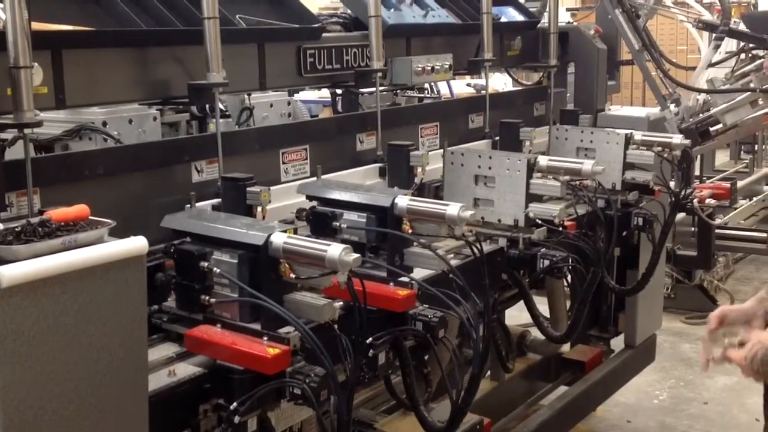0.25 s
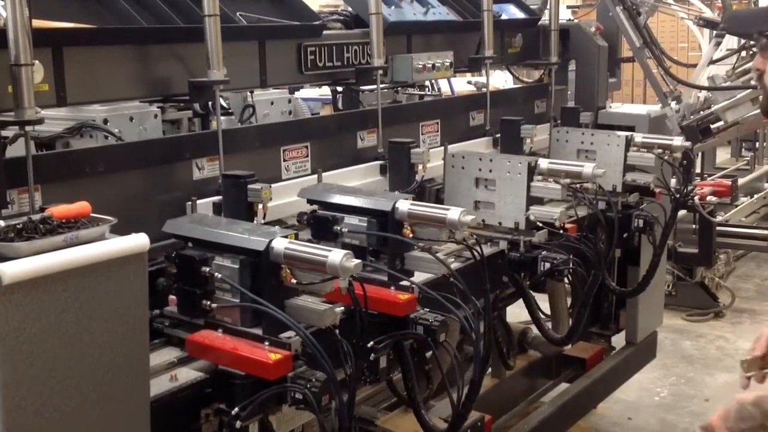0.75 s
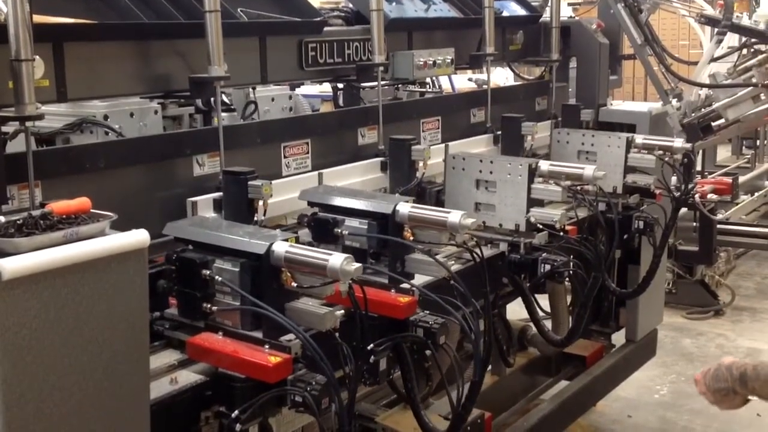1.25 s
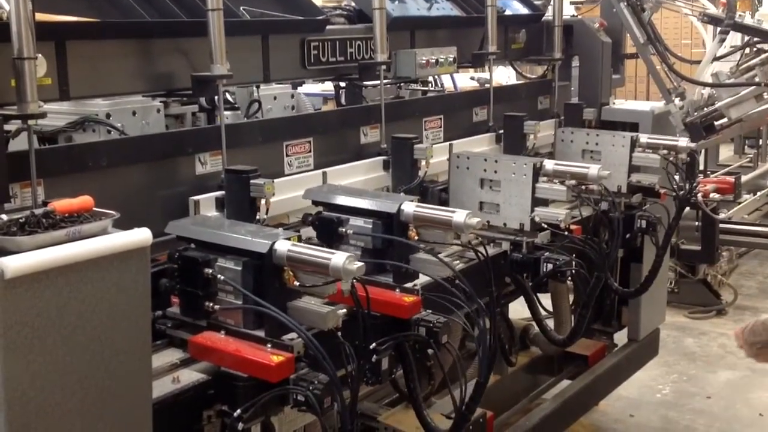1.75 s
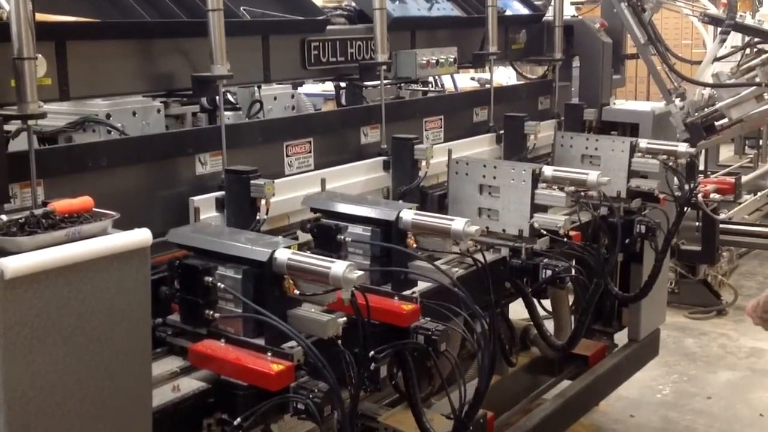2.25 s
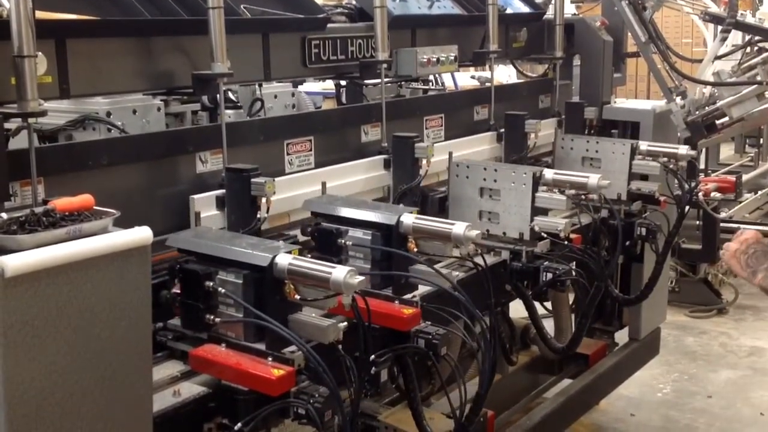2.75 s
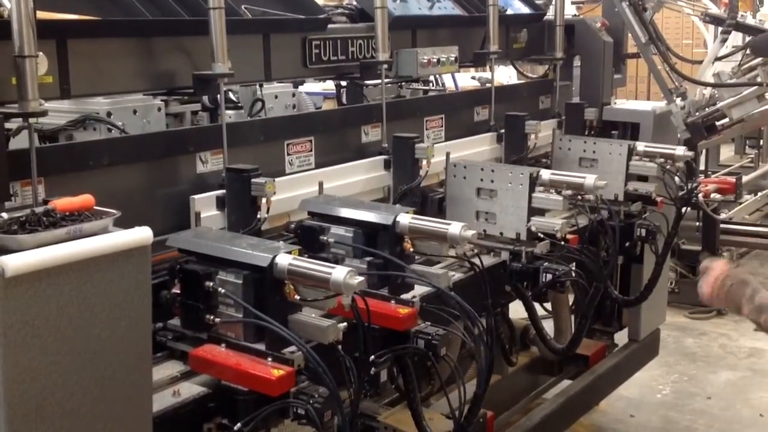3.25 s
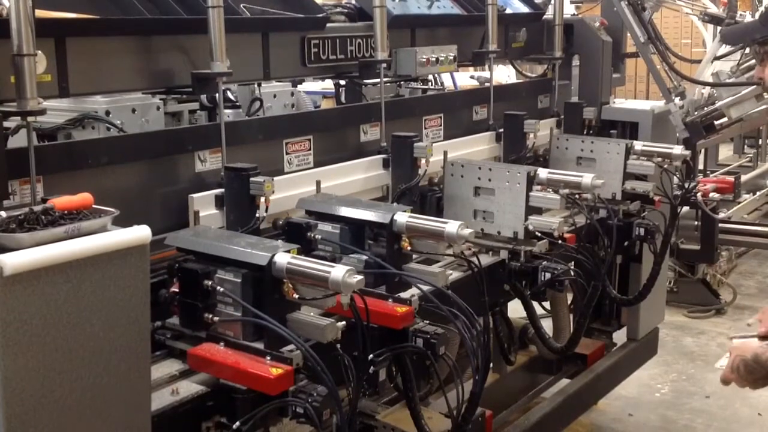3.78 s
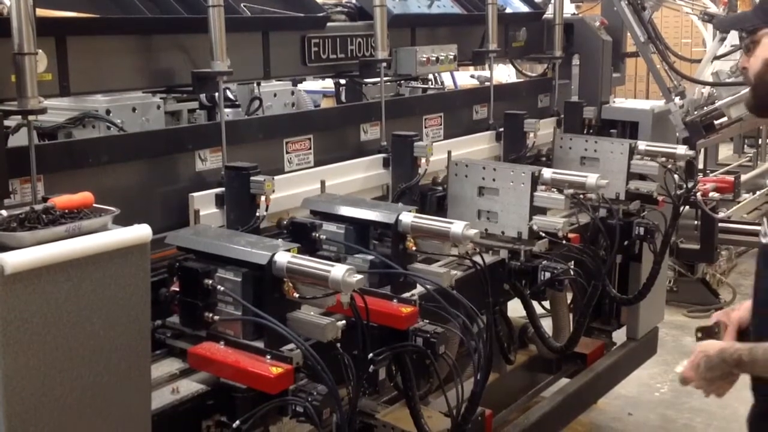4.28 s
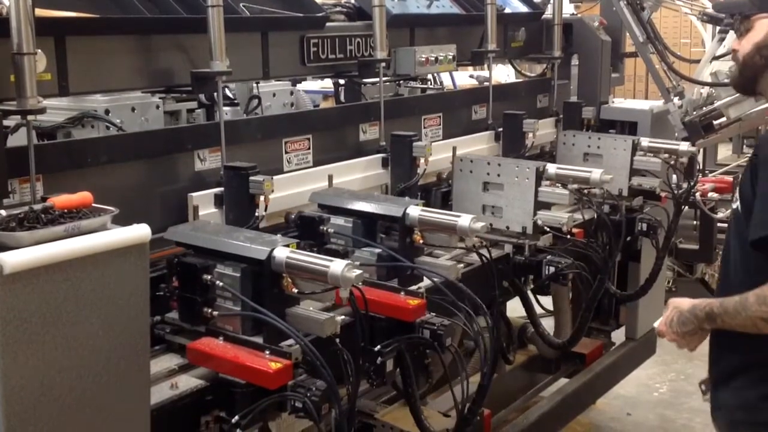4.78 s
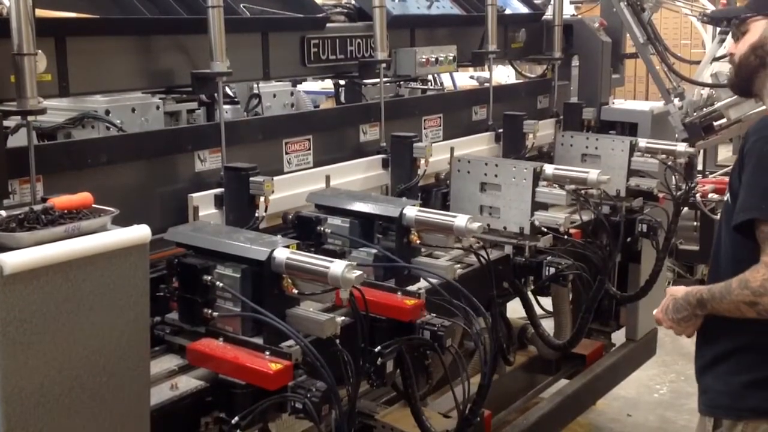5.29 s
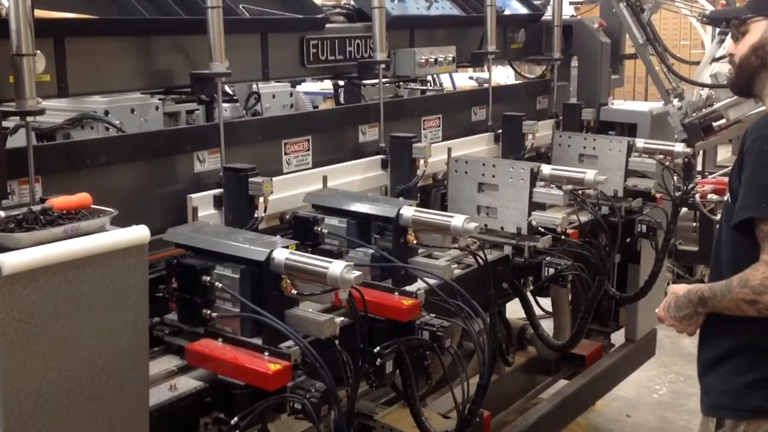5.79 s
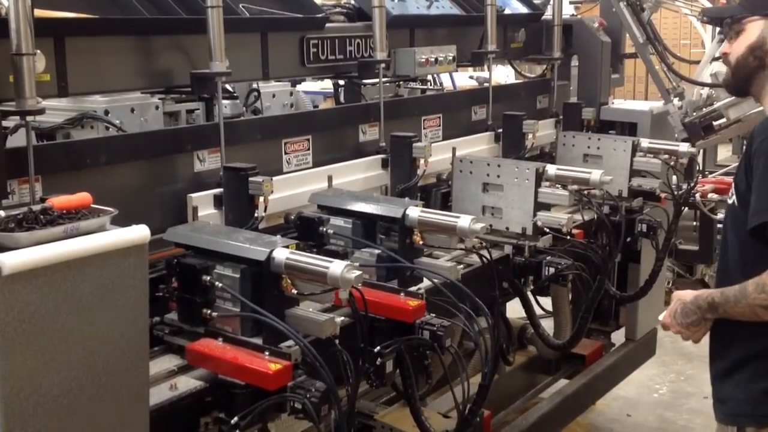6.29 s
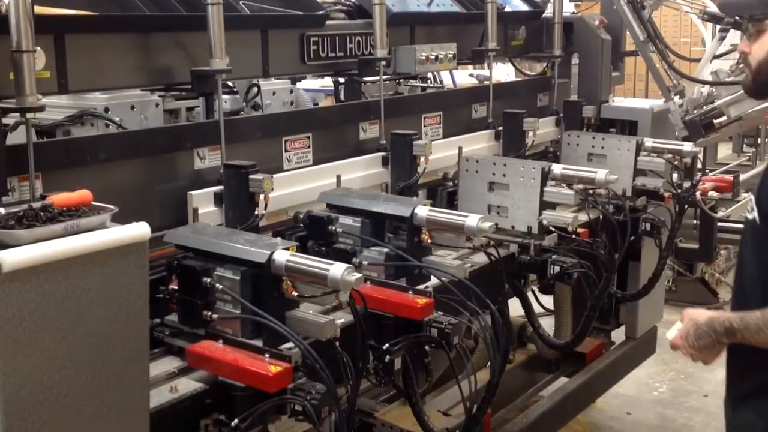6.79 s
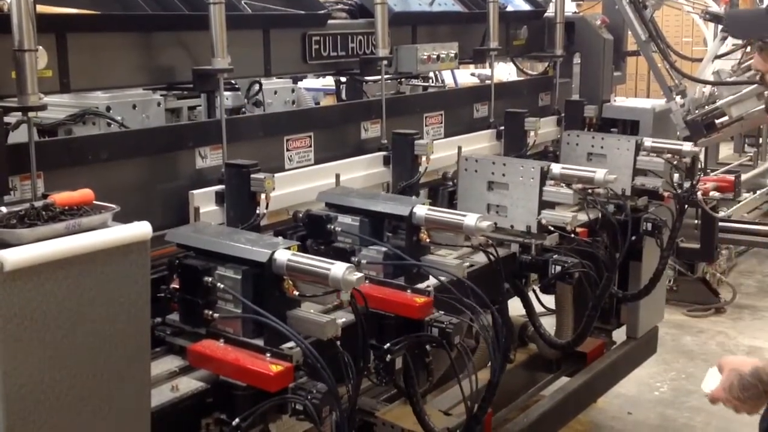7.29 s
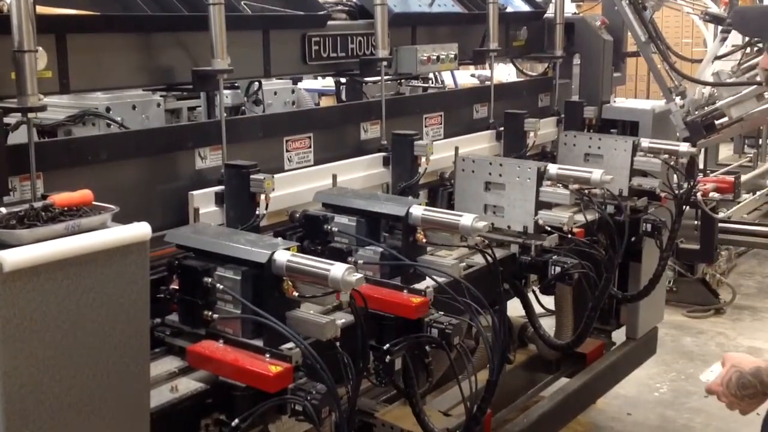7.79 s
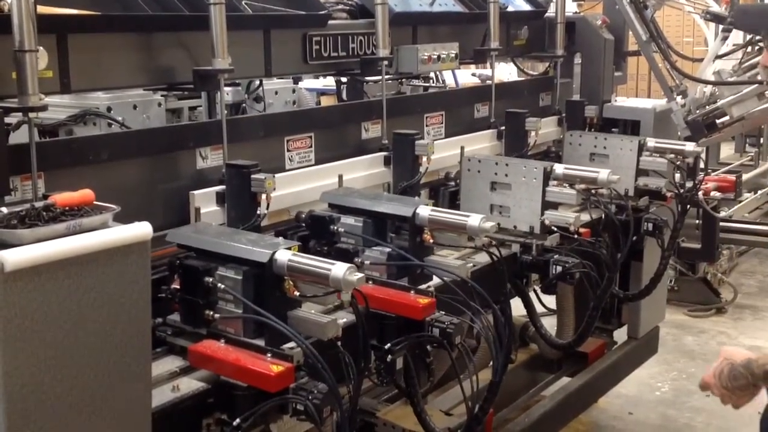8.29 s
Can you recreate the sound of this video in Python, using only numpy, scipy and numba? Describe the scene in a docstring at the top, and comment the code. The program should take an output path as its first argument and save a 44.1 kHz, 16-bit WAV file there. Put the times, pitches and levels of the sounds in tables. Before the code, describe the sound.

From the start, a spindle cuts metal heavily: a loud, bright chip roar with harsh, dissonant buzzing around 1 kHz and above, over workshop hum and broad fan noise. A steady drill whine beside it is switched off at 1.2 s and slides downward, fading until nearly 3 s. Rattling judders come at 0.8-1.0 s, most strongly at 1.2-1.4 s, and again at 2.3-2.7 s, while the cut metal rings in shifting bands. Compressed air swells from 2.5 s and stops at 2.9 s as the roughing collapses. A lighter buzzing pass lasts until 3.5 s, while a high motor whine near 1.8 kHz sets in, beating slowly until about 4.4 s. Trims with fluttering tones, hiss and thin metallic singing begin at 3.5, 5.3 and 7.4 s; a tiny air puff comes at 4.25 s. Between them, wavering whine and shop noise continue to 8.5 s. Close mono phone pickup.

```python
"""A workshop machining line. First a spindle roughs with heavy chatter: sum tones of chatter and rotation over
chip roar; a drill beside it is switched off and its tones sink. Judders swell as the tool bites and the cut
pocket rings. Near the end of the roughing compressed air hisses, a lighter finishing pass follows and a
neighbouring spindle's motor whine sets in. It beats briefly with the freed main spindle, then idles between
three trims of flute tones, hiss and singing. Its faint shaft tones and the shop's noise run throughout."""
import sys
import numpy as np
from scipy import signal
from scipy.fft import rfft, irfft, next_fast_len
from scipy.io import wavfile
from scipy.ndimage import uniform_filter1d
from numba import njit

SR = 44100
rng = np.random.default_rng(int(sys.argv[2]) if len(sys.argv) > 2 else 0)


def output_pcm(signal):
    """Save a mono or channel-first signal as 16-bit PCM at the path in sys.argv[1].

    Samples are clipped to [-1, 1] before scaling.
    """
    pcm = np.clip(np.atleast_2d(signal).T, -1, 1) * 32767
    wavfile.write(sys.argv[1], SR, np.round(pcm).astype(np.int16))


N = 376613
T = np.arange(N) / SR  # time in s

# Roughing, sums of chatter and rotation: chatter_multiple, turn_multiple, shallow_db, deep_db
ROUGH_TONES = [(0, 2, -46.5, -59.5), (0, 3, -74, -52), (0, 4, -55, -51), (0, 6, -74, -48.5),
               (0, 7, -82, -52), (0.999, -2, -48, -49.5), (1, -1, -48, -45), (1, 0, -39, -44.5),
               (0.998, 1, -48, -62), (2, 1, -54, -56), (3, -1, -55, -58), (4, -4, -58, -55),
               (4, -2, -53, -62), (2, -3, -42.5, -57.5), (2, -2, -50, -43), (2, -1, -68, -47),
               (2, 0, -48, -55), (2, 2, -52, -60), (3.002, -8, -49, -51.5), (3, -4, -66, -48),
               (3, -2, -46, -59), (3, 0, -62, -58), (4, -7, -51, -56), (4, -10, -66, -49),
               (5, -10, -49.5, -47)]
# Roughing, sums of chatter and fixture ring: chatter_multiple, shallow_db, deep_db
FIXTURE_SUMS = [(1, -47.5, -48), (2, -46, -53)]
# Gain of all the roughing tones over time: time_s, gain_db
ROUGHING_GAIN = [(1.15, -2.5), (2.0, -0.5), (2.68, -0.5), (2.78, -3.5), (2.88, -7.5), (2.96, -20),
                 (3.2, -45)]
# Finishing pass, sums of chatter and rotation: chatter_multiple, turn_multiple, first_db, last_db
FINISH_TONES = [(0, 3, -59, -56), (0, 5, -63, -55), (0, 4, -59, -57), (1, 1, -69, -54), (1, 3, -62, -58),
                (1, 4, -55, -56), (2, -4, -52, -57), (2, -3, -51, -54), (2, -2, -49.5, -57),
                (3, -5, -50.5, -58)]
# Chatter fundamental in the finishing pass: time_s, level_db
FINISH_HUM = [(3.0, -55), (3.2, -61), (3.33, -45), (3.53, -54), (3.73, -70)]
# Gain of the chip roar over time: time_s, gain_db
ROAR_GAIN = [(0, -35.5), (1.0, -36), (2.85, -35.5), (2.93, -40), (3.53, -43.5), (3.65, -49.5), (4.3, -57)]
# Spectrum of the chip roar: frequency_hz, relative_db (per Hz)
ROAR_COLOUR = [(100, -47.5), (400, -24.5), (750, -20), (1100, -11), (1700, -9.5), (2800, -6), (5000, -8.5),
               (9000, -12), (15000, -25)]
# Resonances of the cut pocket: start_s, peak_s, end_s, first_hz, last_hz, width_hz, gain_db
POCKET = [(0.549, .92, 1.32, 2200, 2140, 160, -41.5), (1.15, 1.5, 2.66, 2900, 2730, 260, -40),
          (1.305, 1.55, 1.8, 1730, 1650, 110, -41.5), (1.8, 2.55, 2.77, 2210, 2140, 220, -34.5),
          (2.618, 2.8, 2.87, 1750, 1680, 220, -37.5)]
# Judders when the tool bites harder: centre_s, level_db
JUDDERS = [(.82, -39), (.91, -37), (1.005, -37), (1.175, -36), (1.27, -31), (1.371, -31.5), (2.29, -43),
           (2.375, -48), (2.455, -42), (2.55, -40), (2.68, -40)]
# Workpiece modes that colour the judders: centre_hz, width_hz, relative_db
JUDDER_MODES = [(1660, 400, 0.16), (2840, 1300, 1.9), (5950, 7000, -1.2)]
# Drill motor tones before switch-off: turn_multiple, level_db
DRILL_TONES = [(1, -60.5), (4, -59), (5, -52), (6, -45.5), (12, -52), (18, -56), (20, -55)]
# Frame resonances that lift a drill tone sinking through them: centre_hz, width_hz, lift_db
FRAME = [(1240, 38, 12)]
# Compressed air: start_s, end_s, level_db, centre_hz, width_hz
BLASTS = [(2.483, 2.89, -36.5, 6500, 9000), (4.246, 4.29, -48, 8700, 5000)]
# Neighbour's motor slot whine: time_s, sixth_multiple_db, twelfth_multiple_db, eighteenth_multiple_db
WHINE = [(2.7, -65, -57, -66), (3.05, -49, -45, -58), (3.4, -57, -54.5, -57), (3.8, -51, -52.5, -51.5),
         (4.45, -51.5, -58, -59), (4.71, -54, -49.5, -66), (4.75, -59, -52.5, -61),
         (5.35, -55.5, -61.5, -56.5), (5.7, -50.5, -50, -64), (6.3, -55.5, -53.5, -61),
         (6.65, -57, -50, -55.5), (6.85, -69, -62, -66), (7.4, -62, -71, -62), (7.55, -52, -59, -59),
         (8.15, -50.5, -58, -61), (8.54, -52.5, -79, -61)]
# Neighbour's shaft tones: turn_multiple, level_db
IDLE_TONES = [(1, -73.5), (2, -70), (3, -69.5), (4, -69.5), (5, -71), (10, -62)]
# Neighbour's trimming cuts: contact_s, full_depth_s, flute_db, hiss_db
TRIMS = [(3.537, 3.61, -53, -45.5), (5.334, 5.576, -54.5, -45), (7.355, 7.62, -54.5, -45)]
# Balance of the flute tones in a trim: turn_multiple, relative_db
FLUTE_TONES = [(2, -5.5), (4, -0.5), (8, -10)]
# Tool singing around the trims: start_s, end_s, turn_multiple, peak_db
SINGING = [(3.5, 3.95, 14, -53), (3.64, 4.2, 17, -55.5), (3.55, 3.86, 22, -55), (5.63, 5.97, 14, -53),
           (5.1, 6.02, 15, -57), (5.53, 6.03, 16, -53.5), (5.57, 5.95, 17, -50.5), (5.48, 5.8, 20, -55),
           (7.45, 7.88, 14, -51.5), (7.66, 7.96, 15, -50.5), (5.35, 5.2, 14, -56), (3.93, 4.16, 8, -55),
           (4.05, 4.94, 5, -66.5)]
# Spectrum of the shop noise: frequency_hz, relative_db (per Hz)
SHOP_COLOUR = [(25, -44), (60, -42), (130, -15), (290, -6.5), (394, -13), (790, -0.5), (1350, -7.5),
               (1810, 0), (2780, -3), (3090, 0.5), (3930, -2.5), (7480, -2.5), (13500, -15), (15000, -16.5)]

# Main spindle
PLUNGE_S, DEEP_S, ROUGH_END_S = 1.1, 2.57, 2.88  # plunge begins, full depth, roughing ends
FINISH_START_S, FINISH_END_S = 2.76, 3.54
ENTRY_DEPTH = 0.099  # depth before the plunge, 1 = full
LOADED_HZ = 298.7  # mean turns per s under load
SLIP_HZ = 1.035  # how far below the neighbour's speed it turns once free
CHATTER_HZ, FINISH_CHATTER_HZ, CHATTER_SAG_S = 1152.8, 1137, .35  # mean pitches, time constant between
FIXTURE_HZ, FIXTURE_WIDTH_HZ = (1041, 1030), 28  # centre before and after the plunge begins
FIXTURE_DB, FIXTURE_FADE_DB_S = (-47, -42.5), 33  # at depth 0 and 1; fade as roughing ends
FLUTE_PAIR_DB, FLUTE_PAIR_FADE_DB_S, FLUTE_PAIR_END_S = -53, 11.5, 4.08  # runs on after the cut
POCKET_LIFT_DB = 37.5  # cutting tones against noise within a pocket resonance
REPEAT_HZ = 42.69  # about a seventh of the turn rate: chatter and flutes fall back into step
REPEAT_KEEP, REPEAT_DB = 0.818, -2  # share returning each round; level against the fresh roar
JUDDER_S = 0.017  # standard deviation of a judder's bell-shaped swell
JUDDER_GRIP_DB, JUDDER_ROAR_DB = 24.5, 22  # how strongly a bite swells the cutting tones and the roar
RELIEF, RELIEF_S = 0.51, 0.044  # the cut slackens after each bite: share, delay

# Drill: turns per s, switch-off, slowing per s, fade, and drop of the whine within 50 ms
DRILL_HZ, DRILL_OFF_S, DRILL_SAG_HZ_S, DRILL_FADE_DB_S, DRILL_DROP_DB = 326.1, 1.2, 96, 10, 5.5

BLAST_RISE_S, BLAST_T60_S = 0.15, 0.084  # longest rise; time to fall by 60 dB

# Neighbour
IDLE_HZ = 300.65  # mean turns per s
BEAT_DEPTH, BEAT_END_S = 0.68, 4.36
TRIM_OUT_S = 0.53  # from full depth until the tool leaves
FLUTE_FADE_DB_S2 = 33  # dB per s squared

SHOP_DB, TOP_HZ = -44.5, 15200


def main_cut():
    """Chatter modulated by the turning flutes gives sum tones; chips roar and ring pocket and fixture."""
    bite = bites()
    grip = throb(bite, JUDDER_GRIP_DB)
    depth = np.interp(T, [PLUNGE_S, DEEP_S], [ENTRY_DEPTH, 1])
    sag = np.exp(-after(ROUGH_END_S - .06) / CHATTER_SAG_S)
    chatter_hz = FINISH_CHATTER_HZ + (CHATTER_HZ - FINISH_CHATTER_HZ) * sag
    turn = angle(main_turns() * (1 + 0.00042 * walk(9.75)))
    chatter = angle(chatter_hz + 1.198 * walk(12))
    fixture_hz = np.interp(T, [PLUNGE_S - .15, PLUNGE_S], FIXTURE_HZ)
    shake = angle(fixture_hz + 5 * walk(25.15))
    tones = grip * roughing(turn, chatter, shake, depth) + finishing(turn, chatter)
    fixture_db = np.interp(depth, [0, 1], FIXTURE_DB) - FIXTURE_FADE_DB_S * after(ROUGH_END_S - .15)
    fixture = ring(fixture_hz, FIXTURE_WIDTH_HZ) * amp(fixture_db) * gate(-1, 3.1, 0.082) * grip
    return tones + chip_roar(bite) + pocket(tones, bite) + fixture


def roughing(turn, chatter, shake, depth):
    """Chatter combines with rotation and fixture ring; depth shifts the balance of the sum tones."""
    rough_db = curve(ROUGHING_GAIN)[0]
    out = 0
    for m, k, shallow_db, deep_db in ROUGH_TONES:
        db = shallow_db + depth * (deep_db - shallow_db) + rough_db
        out = out + tone(m * chatter + k * turn, db, 2.17, (0, 3.2))
    for m, shallow_db, deep_db in FIXTURE_SUMS:
        db = shallow_db + depth * (deep_db - shallow_db) + rough_db
        out = out + tone(m * chatter + shake, db, 2.6, (0, 3.2))
    return out


def finishing(turn, chatter):
    """Lighter sum tones change balance through the pass; a tone at twice the turn rate outlasts it."""
    progress = np.interp(T, [FINISH_START_S + 0.32, FINISH_END_S - .15], [0, 1])
    sums = 0
    for m, k, first_db, last_db in FINISH_TONES:
        db = first_db + progress * (last_db - first_db)
        sums = sums + tone(m * chatter + k * turn, db, 3.0, (2.6, 3.8))
    sums = sums * gate(FINISH_START_S, 3.7, 0.048) * amp(-120 * after(FINISH_END_S))
    pair_db = FLUTE_PAIR_DB - FLUTE_PAIR_FADE_DB_S * after(FINISH_END_S)
    pair = tone(2 * turn, pair_db, 3.0, (2.6, 4.4)) * gate(ROUGH_END_S, FLUTE_PAIR_END_S, 0.054)
    hum = tone(chatter, curve(FINISH_HUM)[0], 2.4, (2.6, 3.8)) * gate(FINISH_START_S, 3.7, 0.063)
    return sums + pair + hum


def chip_roar(bite):
    """Chips make coloured noise, part fresh and part returning each round, which swells with the bites."""
    chips = coloured(ROAR_COLOUR) + amp(REPEAT_DB) * repeating(coloured(ROAR_COLOUR))
    gain = amp(curve(ROAR_GAIN)[0] + 0.57 * walk(7.2)) * gate(-1, 3.88, 0.25)
    return chips * gain * throb(bite, JUDDER_ROAR_DB)


def pocket(tones, bite):
    """Each resonance swells and fades, rings with repeating clatter and lifts the tones that fall into it."""
    out = 0
    for start, peak, end, first_hz, last_hz, width_hz, db in POCKET:
        hz = np.interp(T, [start, end], [first_hz, last_hz])
        clatter = repeating(ring(hz, width_hz)) * throb(bite, JUDDER_GRIP_DB)
        lifted = amp(POCKET_LIFT_DB) * svf(tones, hz, 1. * width_hz)
        out = out + amp(db) * np.interp(T, [start, peak, end], [0, 1, 0]) * (clatter + lifted)
    return out


def judders():
    """Short rattling swells through the modes of the workpiece."""
    return bites() * unit(sum(amp(db) * ring(hz, width_hz) for hz, width_hz, db in JUDDER_MODES))


def main_turns():
    """Speed of the main spindle: held down by the load, then just under the neighbour's idle speed."""
    return np.where(T < FINISH_END_S, LOADED_HZ, IDLE_HZ - SLIP_HZ)


def bites():
    """Gain of the judders over time, a bell-shaped swell for each bite."""
    return sum(amp(db) * np.exp(-.5 * ((T - s) / JUDDER_S) ** 2) for s, db in JUDDERS)


def throb(bite, grip_db):
    """Gain that swells with each bite and sags just after it."""
    relief = RELIEF * np.roll(bite, int(RELIEF_S * SR))
    return np.maximum(1 + amp(grip_db) * (bite - relief), .2)


def repeating(x):
    """Clatter that partly returns every round, which combs it into rough lines."""
    lag = int(round(SR / REPEAT_HZ))
    rounds = np.resize(x, (N // lag + 1, lag))
    return unit(signal.lfilter([1], [1, -REPEAT_KEEP], rounds, axis=0).ravel()[:N])


def drill():
    """Motor tones that sink together once the power is cut, as friction brakes the spindle evenly."""
    hz = np.maximum(DRILL_HZ - DRILL_SAG_HZ_S * after(DRILL_OFF_S), 1)
    turn = angle(hz * (1 + 0.00095 * walk(14.5)))
    # the whine drops when the current stops, then fades steadily
    fall_db = DRILL_DROP_DB * np.minimum(20 * after(DRILL_OFF_S), 1) + DRILL_FADE_DB_S * after(DRILL_OFF_S)
    out = 0
    for k, db in DRILL_TONES:
        lift_db = sum(lift * np.exp(-.5 * ((k * hz - at) / width) ** 2) for at, width, lift in FRAME)
        out = out + tone(k * turn, db - fall_db + lift_db, 2.4, (0, 2.85))
    return gate(-1, 3.0, 0.085) * out


def air():
    """Jets of compressed air blow chips away: band noise builds up, stops short and dies away in the hall."""
    out = 0
    for start, end, db, hz, width_hz in BLASTS:
        rise = np.clip((T - start) / min(BLAST_RISE_S, (end - start) / 2), 0, 1)
        out = out + ring(hz, width_hz) * rise * amp(db - 60 * after(end) / BLAST_T60_S)
    return out


def neighbour():
    """Whine, shaft, trimming and singing tones all follow one slightly unsteady rotation."""
    turn = angle(IDLE_HZ * (1 + .0002 * walk(10)))
    shaft = sum(tone(k * turn, db, 3.8, (0, 9)) for k, db in IDLE_TONES)
    return slot_whine(turn) + shaft + singing(turn) + trims(turn)


def slot_whine(turn):
    """Motor slots whine at multiples of six turns; the lowest beats with the freed main spindle."""
    slot_db, *upper_db = curve(WHINE)
    # the unloaded main spindle runs at almost the same speed, so the two slot whines beat
    slip = angle(6 * SLIP_HZ * (T > FINISH_END_S))
    beat = BEAT_DEPTH * gate(FINISH_END_S, BEAT_END_S, 0.12) * np.exp(1j * slip)
    out = np.abs(1 - beat) * tone(6 * turn, slot_db, 1.2, (2.7, 9))
    for k, db in enumerate(upper_db):
        out = out + tone(6 * (k + 2) * turn, db, 0.94, (2.7, 9))
    return out * gate(2.4, 9, 0.094)


def singing(turn):
    """The tool sings on single turn multiples, each in one rounded swell."""
    out = 0
    for start, end, k, db in SINGING:
        hump = np.sqrt(np.abs(np.sin(np.pi * np.clip(after(start) / (end - start), 0, 1))))
        out = out + hump * tone(k * turn, db, 0.47, (start, end))
    return out


def trims(turn):
    """On contact the flute tones start at once and fade; a band of hiss swells towards full depth."""
    out = 0
    for start, full, flute_db, hiss_db in TRIMS:
        end = full + TRIM_OUT_S
        fade_db = flute_db - FLUTE_FADE_DB_S2 * after(start) ** 2
        flutes = sum(tone(k * turn, fade_db + db, 1.4, (start, end + .1)) for k, db in FLUTE_TONES)
        out = out + gate(start, start + 2.12 * (full - start), 0.012) * flutes
        swell_s = [start, full - .03, full + 0.065, end - .12, end]
        swell = np.interp(T, swell_s, [0.47, 1.0, 0.48, 0.36, 0.18], left=0)
        # the hiss brightens as the edge digs in
        hiss_hz = np.interp(T, [start, full, end], [4100, 5300, 4500])
        out = out + amp(hiss_db) * swell * ring(hiss_hz, 3300)
    return out


def shop():
    """Fans, pumps and distant machines blend into coloured noise with a slightly wandering level."""
    return coloured(SHOP_COLOUR) * amp(SHOP_DB + .5 * walk(4.56))


def amp(db):
    """dB to gain."""
    return 10 ** (np.asarray(db) / 20)


def curve(table):
    """Columns of a table after its times, one value per sample."""
    s, *columns = np.transpose(table)
    return [np.interp(T, s, c) for c in columns]


def after(s):
    """Seconds since s, 0 before."""
    return np.maximum(T - s, 0)


def gate(start, end, edge):
    """0 to 1 and back, with linear edges."""
    return np.clip(np.minimum(T - start, end + edge - T) / edge, 0, 1)


def unit(x):
    """Scaled to unit power."""
    return x / np.sqrt(np.mean(x ** 2))


def coloured(points):
    """Noise of unit power with the spectrum of (Hz, dB) points."""
    size = next_fast_len(N)
    hz, db = np.transpose(points)
    bin_hz = np.arange(1, size // 2 + 2) * SR / size
    gain = amp(np.interp(np.log(bin_hz), np.log(hz), db))
    return unit(irfft(rfft(rng.standard_normal(size)) * gain, size)[:N])


def walk(rate):
    """Random levels held 1 / rate s and slewed twice; spread near 1."""
    k = int(SR / rate)
    steps = np.repeat(rng.standard_normal(N // k + 1), k)
    return 1.313 * uniform_filter1d(uniform_filter1d(steps, k), k)[:N]


WAVER = walk(13)  # shared slow wobble, read from a random place by every tone


def angle(hz):
    """Running phase of a rotation."""
    return 2 * np.pi * np.cumsum(hz) / SR


def tone(phase, db, waver_db, span):
    """A sine of rms level db that wavers on its way through the hall, sounding within span."""
    out, part = np.zeros(N), slice(int(span[0] * SR), int(span[1] * SR))
    gain = amp((db + waver_db * np.roll(WAVER, rng.integers(N)))[part])
    out[part] = np.sqrt(2) * gain * np.sin(phase[part] + rng.uniform(0, 2 * np.pi))
    return out


@njit
def svf(x, hz, width):
    """State-variable band-pass with a moving centre, gain 1 there."""
    y, band, low = np.empty(len(x)), 0., 0.
    for i in range(len(x)):
        g, k = np.tan(np.pi * hz[i] / SR), width / hz[i]
        v = (band + g * (x[i] - low)) / (1 + g * (g + k))
        band, low, y[i] = 2 * v - band, low + 2 * g * v, k * v
    return y


def ring(hz, width_hz):
    """Noise of unit power through two equal band-passes, each width_hz wide."""
    hz = hz + 0 * T
    once = svf(rng.standard_normal(N), hz, 1. * width_hz)
    return unit(svf(once, hz, 1. * width_hz))


def scene():
    """All sources sum to one signal that feeds both channels."""
    mid = main_cut() + judders() + drill() + air() + neighbour() + shop()
    return np.array([mid, mid])


def record(dry):
    """The phone cuts the top with a steep low-pass."""
    return signal.sosfilt(signal.ellip(10, .2, 70, TOP_HZ, fs=SR, output="sos"), dry)


dry = scene()
out = record(dry)
output_pcm(out)
```